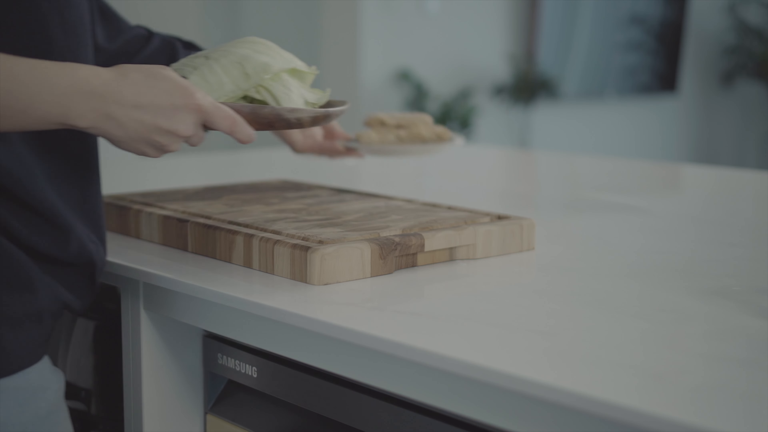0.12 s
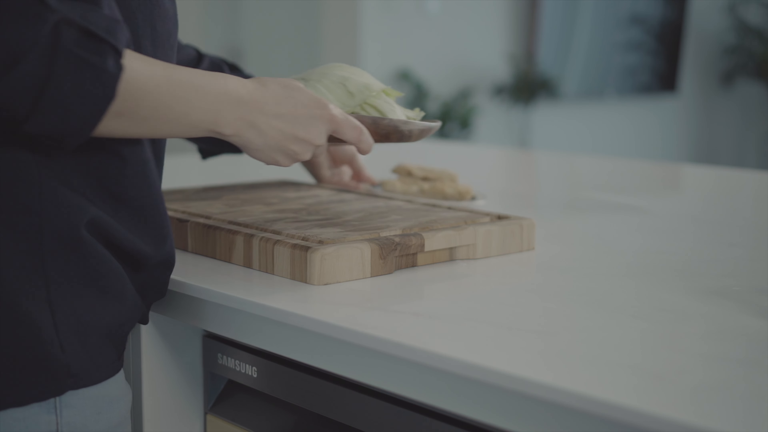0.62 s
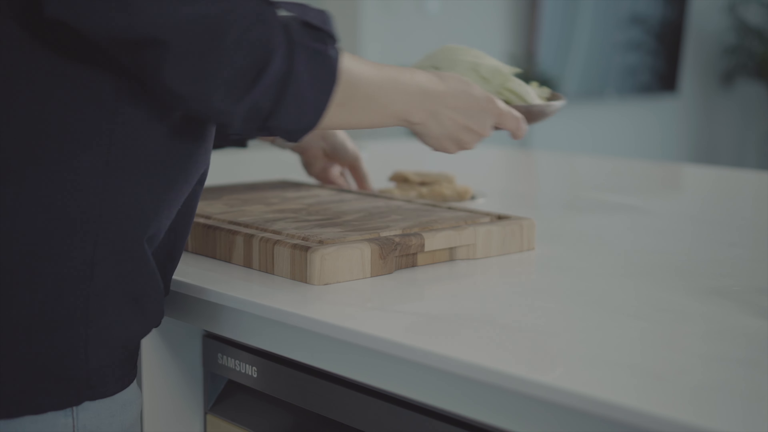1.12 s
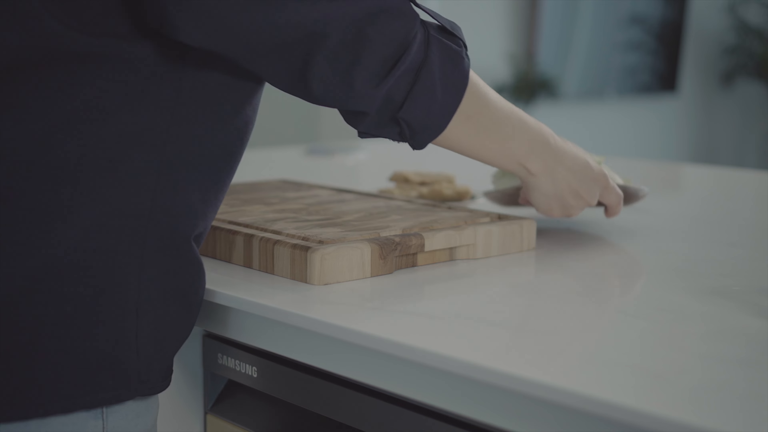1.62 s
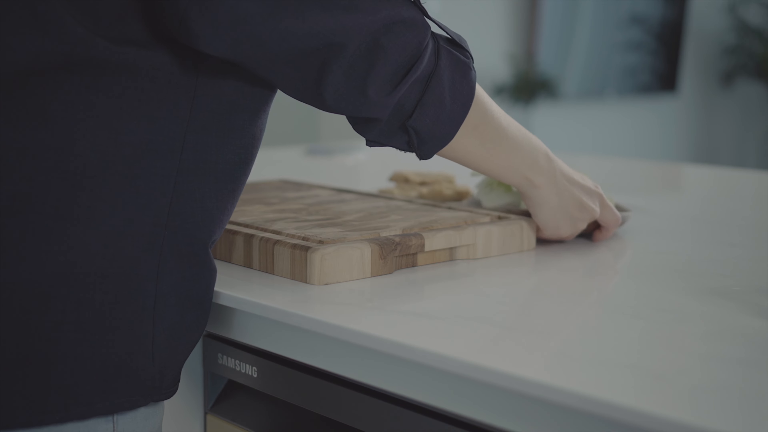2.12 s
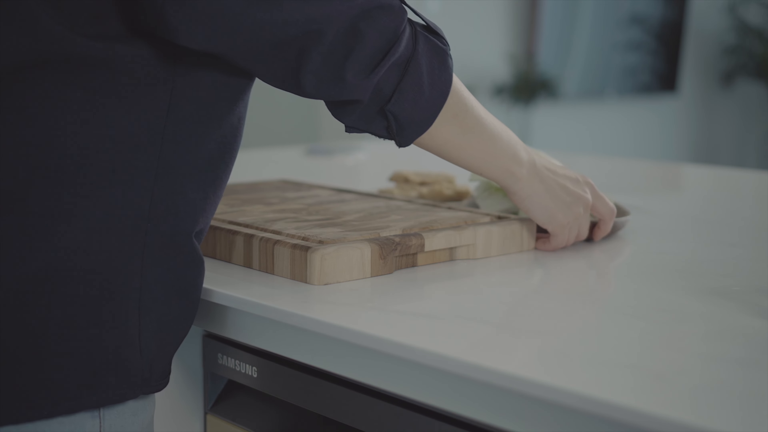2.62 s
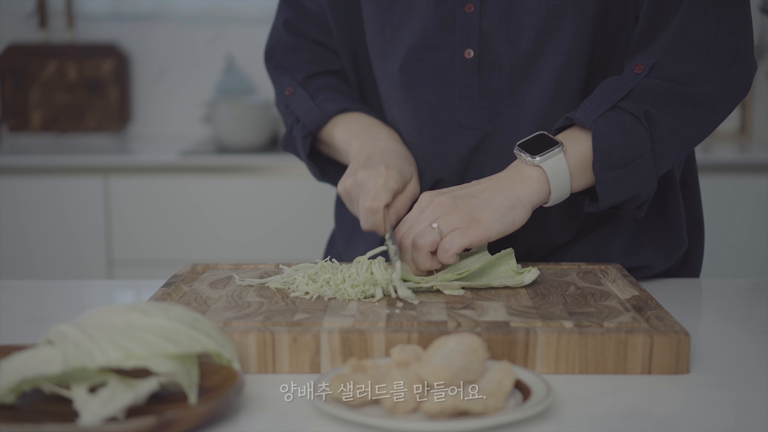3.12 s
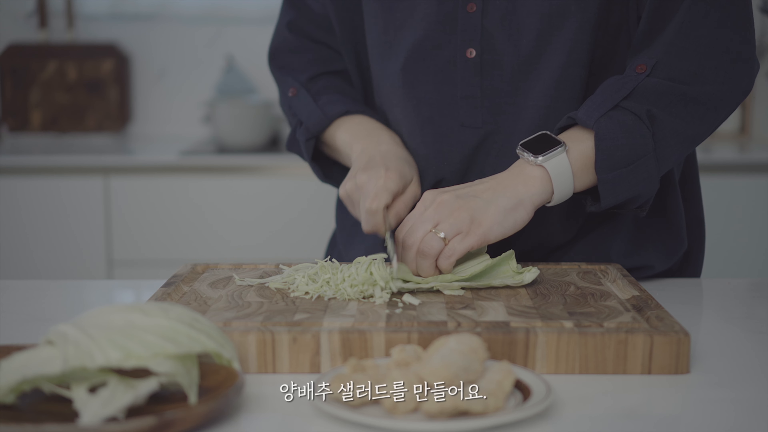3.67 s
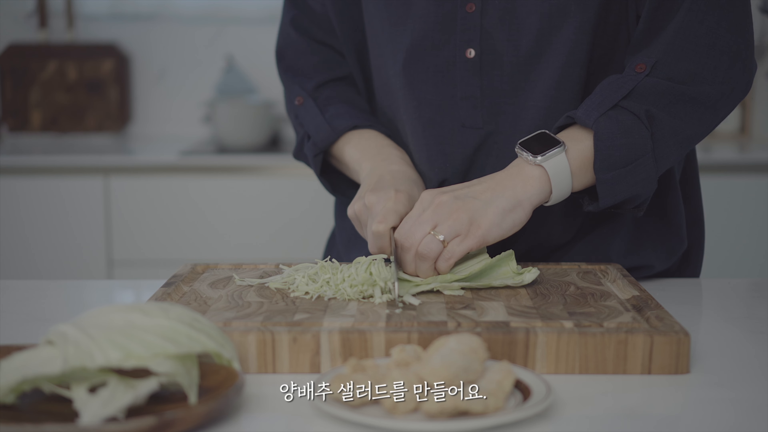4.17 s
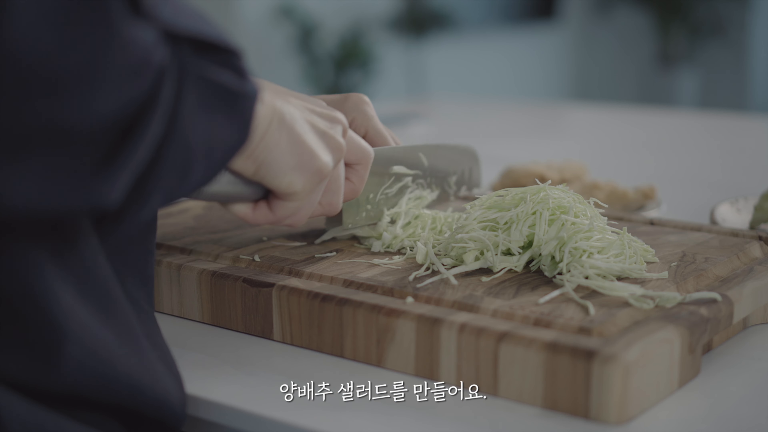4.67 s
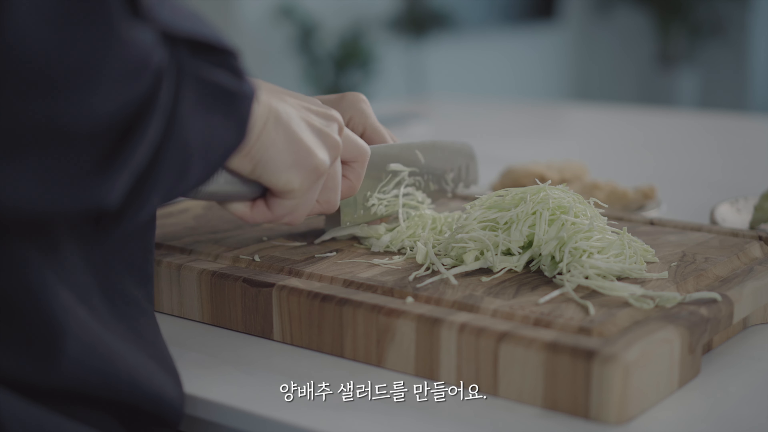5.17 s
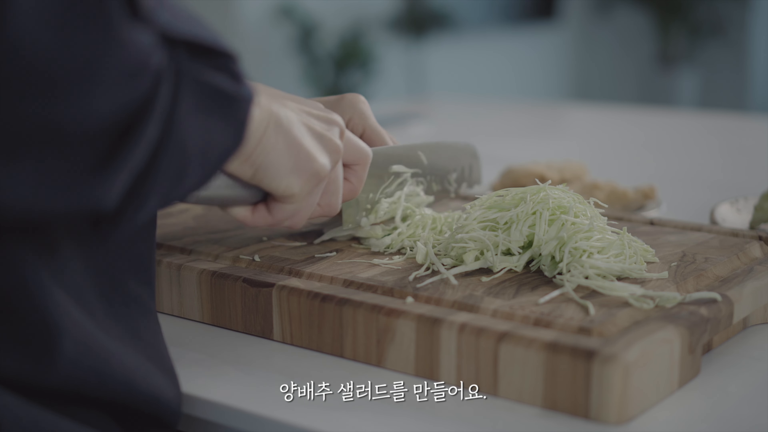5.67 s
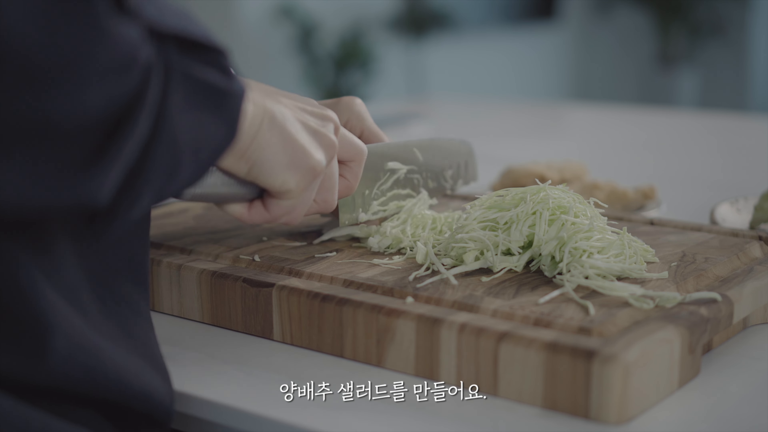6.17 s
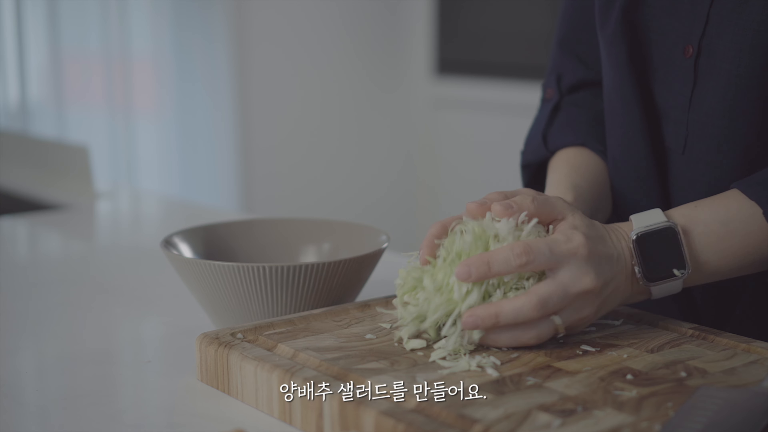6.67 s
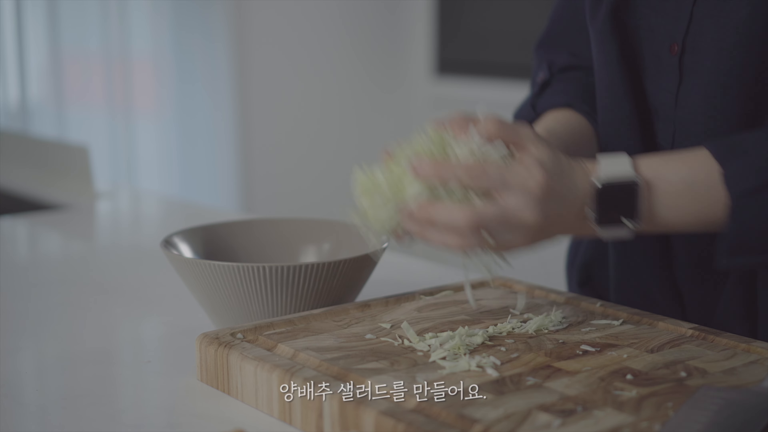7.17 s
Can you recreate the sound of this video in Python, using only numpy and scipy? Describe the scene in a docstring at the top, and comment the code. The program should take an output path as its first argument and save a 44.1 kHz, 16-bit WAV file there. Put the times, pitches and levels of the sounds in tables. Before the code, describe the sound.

In a quiet, hard-walled kitchen, a glazed plate clacks onto a stone counter, then a wooden dish lands much harder. After a pause, a knife tears crisply through cabbage, each main cut ending in a woody knock on a thick board. Tiny blade scrapes and leaf rustles fill the gaps, then only soft handling remains. Close microphone, short bright room echo.

```python
"""A knife shreds cabbage in a hard-walled kitchen: dense clicks shaped by a leaf spectrum make the
tearing, short click bursts make the snaps, and fading sine tones make the knocks on a thick board.
Before the cutting, the end of a clatter is heard, made like the tearing; then a glazed plate and a wooden
dish knock on a stone counter, also as fading sines. Hands move leaves as soft grains; low thuds, rumble,
a quiet hum and filtered-noise hush lie underneath."""
import sys
import numpy as np
from scipy import signal
from scipy.fft import rfft, irfft
from scipy.io import wavfile
from scipy.ndimage import uniform_filter1d

SR = 44100
rng = np.random.default_rng(int(sys.argv[2]) if len(sys.argv) > 2 else 0)


def store_wav(level_fs):
    """Save 16-bit WAV to argv[1]."""
    pcm = np.round(np.clip(np.atleast_2d(level_fs), -1, 1) * 32767)
    wavfile.write(sys.argv[1], SR, pcm.T.astype(np.int16))


def invert_db(level):
    """Linear amplitude ratio for a level in decibels (20 dB per decade), elementwise."""
    return 10 ** (np.asarray(level, dtype=float) / 20)


N = 321684  # samples in the finished scene
LEAD = 4410  # samples of scene before time zero
TIME = np.arange(-LEAD, N) / SR  # s

# room, band by band: f/Hz, time to fall by 60 dB/s, tail level/dB
ROOM_BANDS = [(101.7, 0.94, -6.5), (300, .55, -1), (900, 0.68, -2.5), (2050, 0.65, -4.5),
              (4060, 0.6155, 1.5), (7050, 0.63, -2.5), (15160, 0.17, -8)]
# first echoes off the walls: delay/ms, level/dB
WALL_ECHOES = [(2.3, -13), (3.7, -12), (6.3, -14), (8.9, -14), (13.9, -15), (18.5, -14)]
# colour of the room hush: f/Hz, relative level per Hz/dB
HUSH_SPECTRUM = [(60, -22), (150, 0.5), (500, -4), (1200, -9.5), (4000, -12), (4700, -21.5), (6500, -20),
                 (9000, -26.5), (15800, -32.5)]
# a low hum that sets in once: t/s, f/Hz, level/dB
HUM_SETTING = (6.37, 185, -77)
# soft weight landing on floor or counter: t/s, level before fading and soft start/dB, f/Hz,
# level of the rumble swell before fading and soft start/dB
THUD_EVENTS = [(0.095, -41, 76, -94), (0.627, -40, 64, -68), (1.496, -34.5, 73.4, -70),
               (1.678, -35.5, 68.4, -57), (2.129, -65, 60, -68.5), (2.246, -54, 85.3, -72),
               (2.472, -39.5, 89, -66), (2.989, -33, 103, -44.5), (3.511, -35, 124, -59),
               (4.2, -36, 118, -50), (4.909, -42, 94.2, -54), (5.427, -48, 126, -52.5),
               (5.498, -61, 53.8, -58), (5.922, -42, 120.7, -46.5)]
# ringing tones of the glazed plate: f/Hz, relative level/dB, time to fall by 60 dB/s
PLATE_TONES = [(426, -9.5, 0.056), (672, 0.5, 0.0186), (870, -2, 0.02), (1152, -1, 0.02),
               (1445, 4.5, 0.016), (2020, 14.5, 0.0049), (2220, -8, .015), (2204, -2, 0.012),
               (3000, 6, 0.0032), (3200, -4, 0.025), (3600, -2.5, 0.0032), (4370, -10.5, 0.024),
               (5860, -62, 0.0047), (6840, -22, 0.037), (9000, -26.5, 0.063), (10360, -28, 0.048),
               (12300, -38, 0.059), (14500, -43, .05)]
# ringing tones of the wooden dish: f/Hz, relative level/dB, time to fall by 60 dB/s
DISH_TONES = [(200, -27, 0.071), (316.5, -28.5, 0.008), (631, -13, 0.0084), (1024, -8, 0.029),
              (1350, -13, 0.0034), (1468, 8, 0.0067), (1960, 6.5, 0.0061), (2450, -4, 0.012),
              (3195, -2, 0.01), (3800, -18.5, 0.0076), (4490, -15, 0.0089), (5800, -23.5, 0.005),
              (6780, -18.5, .006), (9350, -27.5, 0.00521), (13000, -6.5, .0015)]
# ringing tones of the chopping board: f/Hz, relative level/dB, time to fall by 60 dB/s
BOARD_TONES = [(119.8, 5, 0.037), (340.8, -4, 0.014), (514, -2.5, 0.00733), (716, 2.5, 0.037),
               (793, 0.5, 0.019), (913.8, 4.5, 0.02), (1139, -7, 0.013), (1700, 18, 0.0029),
               (2224, 4, 0.0055), (2643, 5.5, 0.0072), (3110, -25, 0.006), (3670, -10.5, 0.0086),
               (6200, -15.5, 0.0051), (11000, -25, .002)]
# ringing tones of the knife blade: f/Hz, relative level/dB, time to fall by 60 dB/s
BLADE_TONES = [(9230, 3, 0.0032), (9600, 6, 0.008), (10400, -11, 0.012), (11240, 2.5, .012),
               (13200, 8, 0.011), (15100, 0, .008)]
# blows on the plate: t/s, peak level before the room/dB, contact time/ms,
# f below which the spot barely moves the body/Hz, fading time of the chatter/ms
PLATE_BLOWS = [(0.576, -19, 0.12, 675, 16.6), (1.02, -42.5, 0.33, 350, 34), (1.04, -42, 0.45, 300, 16.5)]
# blows on the dish: t/s, peak level before the room/dB, contact time/ms,
# f below which the spot barely moves the body/Hz, fading time of the chatter/ms
DISH_BLOWS = [(1.78, -7.5, 0.142, 486, 1.4), (2.255, -49.5, 0.84, 300, 22), (2.27, -53, 1.94, 151.5, 22),
              (2.459, -30.5, 0.27, 482, 3.5)]
# knocks on the board: t/s, peak level before the room/dB, contact time/ms,
# f below which the spot barely moves the body/Hz, fading time of the chatter/ms
BOARD_BLOWS = [(2.983, -13.5, 0.3, 260, 0.2), (3.509, -13, 0.21, 1570, 0.35),
               (3.512, -19.5, 0.56, 593, 0.55), (4.197, -16.5, 0.26, 1920, 0.22),
               (4.208, -21, 0.72, 245, 3.4), (4.579, -41, 0.41, 710, 22), (4.876, -31.5, 0.35, 2230, 6.9),
               (4.901, -19, 0.49, 300, 0.56), (5.426, -21.5, 0.62, 300, 0.15),
               (5.884, -34, 0.417, 505, 2.4), (5.907, -27, 0.36, 2200, 1.4),
               (5.922, -23, 0.521, 300, 0.115)]
# colour of moving leaves: f/Hz, relative level per Hz/dB
LEAF_SPECTRUM = [(120, -62), (200, -1), (263, -6.5), (393, -8.5), (732, -3.5), (1830, -5.5), (2830, -6),
                 (3900, -8), (4600, -19.5), (6000, -18), (9820, -22.5), (15800, -35.5)]
# hands moving leaves, one swell a move: start t/s, length/s, level/dB,
# share of the move at which it is loudest, swish f/Hz
LEAF_MOVES = [(3.206, 0.47, -63.5, 0.44, 3000), (3.833, 0.129, -67, 0.18, 3000),
              (4.007, 0.069, -67, 0.98, 3200), (4.674, 0.0702, -59, 0.126, 3800),
              (4.74, .11, -65, 0.95, 3500), (6.253, 0.257, -70, .2, 3600), (6.359, 0.18, -62.5, 0.63, 3020),
              (6.57, 0.064, -63.5, 0.19, 2850), (6.619, .17, -64, 0.9, 2850),
              (6.799, 0.21, -76, 0.22, 3000), (7.12, 0.41, -64.5, 0.58, 3430)]
# blade grazing a fingernail or the board: t/s, peak level before the room/dB, graze length/s
BLADE_GRAZES = [(3.191, -54, 0.042), (4.691, -48, 0.012), (4.762, -53, 0.026), (4.79, -48, .03),
                (5.076, -49, 0.0091), (5.178, -44, 0.013), (5.282, -52.5, .03), (5.679, -51, 0.03),
                (5.788, -43, 0.017), (6.179, -46.5, 0.0093), (6.258, -52, 0.044)]
# colour of tearing cabbage: f/Hz, relative level per Hz/dB
CABBAGE_SPECTRUM = [(88, -68), (150, -6.5), (230, -18), (405, -5), (587, -12), (801, 0), (974, -4.5),
                    (2170, 3.5), (2680, 0.5), (3520, 3), (4810, -10), (6200, -10), (8980, -14),
                    (15800, -30)]
# short snaps of ribs, and a tick on a knock: t/s, peak level before the room/dB, pitch f/Hz,
# brightness/(dB per octave), held between -6 and 8
SHORT_SNAPS = [(0.0844, -46, 3700, -0.5), (2.8747, -44.5, 5650, 3), (2.8846, -43.5, 3282, -1.5),
               (2.9154, -34.5, 3360, 1), (2.9316, -27, 3760, 2), (2.9444, -29.5, 6200, 2.5),
               (2.9538, -30.5, 4000, 1.5), (3.4274, -44.5, 2200, -1), (3.4411, -41, 5930, 0),
               (3.4911, -31, 5900, 7.5), (3.9776, -53, 1900, 8), (4.0806, -47, 3280, 4),
               (4.0964, -51, 2930, 4), (4.1128, -29.5, 5800, 3), (4.139, -26.5, 4000, 2.5),
               (4.1968, -22.5, 6300, 1.5), (4.2074, -27.5, 7500, 6), (4.577, -37.5, 1650, -4),
               (4.8344, -40.5, 8600, 7.5), (4.8469, -36, 3800, -1), (4.9596, -30.5, 2250, -1),
               (4.9714, -40.5, 2270, -3.5), (5.0627, -43, 5500, 5), (5.3168, -41, 4150, 4.5),
               (5.3306, -34.5, 1450, 4.5), (5.345, -43, 4000, 6.5), (5.4054, -31, 3600, 2),
               (5.4584, -40, 9000, 13), (5.4715, -35, 3160, -2), (5.8054, -37.5, 3800, -7.5),
               (5.8144, -37.5, 2670, 8), (5.84, -34, 9000, -2), (5.8566, -27.5, 1803, 5),
               (5.9567, -41, 9600, 8), (6.0924, -59.5, 9000, 2.5), (6.108, -43.5, 3060, 3),
               (6.8937, -61, 3710, -5)]
# knife strokes, after the end of an earlier clatter at the very start: start t/s, length/s,
# level at four fifths of the stroke before bunching/dB, rise to it/dB (negative: starts louder),
# brightness/(dB per octave)
CLATTER_END_AND_STROKES = [(-.05, .058, -53, -4, -1.5), (2.88, .11, -33.5, 31, -0.3),
                           (3.4, 0.059, -49, 28.5, 2), (3.489, .022, -37.5, 17, -2),
                           (3.977, 0.038, -66.5, -6, 0.25), (4.074, .14, -35.5, 32.5, 0.64),
                           (4.839, .065, -40.5, 6, 0.5), (5.335, 0.09, -39.5, 10.5, 0.5),
                           (5.753, 0.065, -49.5, 15.5, 0.5), (5.853, 0.069, -40.5, 11.5, 1)]


def read(points, hz):
    """Reads a spectrum table at any frequency, on a logarithmic frequency axis."""
    f, value = np.transpose(points)
    return np.interp(np.log(hz + 1), np.log(f + 1), value)


def add(mix, s, sound):
    """Mixes a sound in at time s, in seconds."""
    part = mix[round(s * SR) + LEAD:][:len(sound)]
    part += sound[:len(part)]


def colour(points, tilt_db=0., peak=(1000, 0, 1)):
    """A short filter of energy 1: a spectrum, a tilt per octave and one peak (Hz, dB, octaves)."""
    hz = abs(np.fft.fftfreq(2048, 1 / SR))
    peak_hz, peak_db, octaves = peak
    level_db = read(points, hz) + tilt_db * np.log2((hz + 100) / 3000)
    level_db += peak_db * np.exp(-.5 * (np.log2((hz + 1) / peak_hz) / octaves) ** 2)
    log_gain = np.log(invert_db(level_db))
    # the Hilbert transform gives the phase that makes the filter respond at once
    taps = np.fft.ifft(np.exp(np.conj(signal.hilbert(log_gain)))).real[:1024]
    return taps / np.linalg.norm(taps)


def steady(points):
    """Steady noise of rms 1 with this spectrum."""
    hz = np.fft.rfftfreq(len(TIME), 1 / SR)
    spectrum = rfft(rng.standard_normal(len(TIME))) * invert_db(read(points, hz))
    noise = irfft(spectrum, len(TIME))
    return noise / np.std(noise)


def crackle(count, per_s, spread_db):
    """Random clicks of uneven size and random sign, scaled to rms 1."""
    chance = rng.random(count)
    size = rng.exponential(1, count)
    sign = rng.choice([-1., 1.], count)
    clicks = (chance < per_s / SR) * sign * invert_db(spread_db * np.minimum(size, 3))
    return clicks / (np.std(clicks) + 1e-12)


def kitchen(near):
    """Hard walls give first echoes, then a dense tail in which each band dies at its own speed."""
    taps = np.zeros(SR)
    at = np.arange(300, SR - 12, 12)
    taps[at + rng.integers(0, 12, len(at))] = rng.choice([-1., 1.], len(at))
    hz, t, bands = signal.stft(taps, SR, nperseg=256)
    table = np.array(ROOM_BANDS)
    t60 = read(table[:, [0, 1]], hz)[:, None]
    tail_db = read(table[:, [0, 2]], hz)[:, None]
    bands *= invert_db(tail_db - 60 * t / t60)
    bands /= np.sqrt(t60 * len(at) / np.log(1e6))  # evens out the energy of long and short tails
    response = signal.istft(bands, SR, nperseg=256)[1][:SR]
    response *= 1 - np.exp(-np.arange(SR) / SR / 0.005)  # the tail takes a moment to build
    response[0] = 1  # direct sound
    for ms, db in WALL_ECHOES:
        response[round(ms * SR / 1000)] += invert_db(db)
    return signal.fftconvolve(near, response)[:len(near)]


def hush():
    """The faint hush of the room is steady noise, strongest in the lows and weak in the treble."""
    return invert_db(-72.5) * steady(HUSH_SPECTRUM)


def rumble():
    """Very low noise that each thud swells for a while."""
    rise_s, t60_s = 0.037, 0.9
    t = np.arange(SR) / SR
    level = np.full(len(TIME), invert_db(-65))  # at rest
    for s, _, _, shudder_db in THUD_EVENTS:
        add(level, s - rise_s, invert_db(shudder_db - 60 * t / t60_s) * (1 - np.exp(-t / rise_s)))
    return steady([(15, 0.5), (30, 1.5), (70, -6.5), (130, -13.0), (250, -59)]) * level


def hum():
    """A narrow band of noise makes a slightly fuzzy low hum."""
    s, hz, db = HUM_SETTING
    band = [(hz - 30, -50), (hz - 4, -6), (hz, 0), (hz + 4, -6), (hz + 30, -50)]
    return invert_db(db) * steady(band) * (TIME > s)


def thuds(mix):
    """A soft landing is a low tone that swells gently and dies."""
    t60_s, rise_s = 0.12, 0.027
    t = np.arange(SR // 2) / SR
    for s, level_db, hz, _ in THUD_EVENTS:
        fade = invert_db(level_db - 60 * t / t60_s) * (1 - np.exp(-t / rise_s))
        add(mix, s, fade * np.sin(2 * np.pi * hz * t))


def blows(mix, tones, table):
    """A blow rings a body's tones from its own spot; a long contact cannot drive the high ones."""
    hz, db, t60 = np.transpose(tones)[:, :, None]
    sign = (-1.) ** np.arange(len(tones))[:, None]  # neighbouring tones push the air in opposite senses
    t = np.arange(SR // 5) / SR
    for s, peak_db, contact_ms, low_hz, chatter_ms in table:
        spot_db = 1.5 * rng.standard_normal(hz.shape)
        drive = sign * invert_db(db + spot_db)
        drive = drive / (1 + (hz * contact_ms / 1000) ** 3) / (1 + (low_hz / hz) ** 3)
        sound = (drive * invert_db(-60 * t / t60) * np.sin(2 * np.pi * hz * t)).sum(0)
        sound *= 1 - np.exp(-t / (contact_ms / 1000))  # the force builds up over the contact
        # small rebounds follow the first blow
        chatter = 0.18 * crackle(len(t), 1500, 2.1) * np.exp(-t * 1000 / chatter_ms)
        chatter[0] = 1
        sound = signal.fftconvolve(sound, chatter)[:len(t)]
        add(mix, s, invert_db(peak_db) * sound / abs(sound).max())


def rustle(mix, start, length, db, top, swish_hz):
    """Damp leaves sliding make soft, dense grains that swell once in each move."""
    t = np.arange(0, length, 1 / SR)
    swell_db = np.interp(t / length, [0, top, 1], [-6, 0, -6])
    grains = invert_db(db + swell_db) * crackle(len(t), 12000, 2.2)
    grains *= signal.windows.tukey(len(t), .1)  # soft ends
    add(mix, start, np.convolve(grains, colour(LEAF_SPECTRUM, peak=(swish_hz, 1, 0.091))))


def grazes(mix):
    """Tiny slips scratch and set the high tones of the blade singing for a moment."""
    hz, db, t60 = np.transpose(BLADE_TONES)[:, :, None]
    t = np.arange(SR // 10) / SR
    for s, peak_db, length in BLADE_GRAZES:
        spot_db = 3 * rng.standard_normal(hz.shape)
        ring = (invert_db(db + spot_db - 60 * t / t60) * np.sin(2 * np.pi * hz * t)).sum(0)
        ring /= np.linalg.norm(ring)
        ring[:1024] += invert_db(10.0) * colour(CABBAGE_SPECTRUM, 1.6)  # the scratch itself
        slips = crackle(len(t), 4200, 5.9) * (t < length) * np.exp(-t / 0.0455)
        sound = signal.fftconvolve(ring, slips)
        add(mix, s, invert_db(peak_db) * sound / abs(sound).max())


def snaps(mix):
    """A rib snap, or the tick on a knock, is a burst of clicks dying within milliseconds around one pitch."""
    dying = np.exp(-np.arange(256) / SR / .0014)
    for s, peak_db, hz, bright_db in SHORT_SNAPS:
        pitch = colour(CABBAGE_SPECTRUM, np.clip(bright_db, -6, 8), peak=(hz, 10.5, 0.1))
        sound = np.convolve(crackle(len(dying), 16000, 1.3) * dying, pitch)
        add(mix, s, invert_db(peak_db) * sound / abs(sound).max())


def stroke(mix, start, length, turn_db, rise_db, tilt):
    """Dark and bright layers burst in bunches as the edge tears leaves; a clatter's end is made alike."""
    turn_at, rise_bend, sag_db = 0.81, 1.54, 6  # share of the stroke, curve, fall after the turn in dB
    brighten_db = 0.5  # dB per octave gained from start to end as the edge speeds up
    bunch_db, bunch_samples = 4.5, 150  # unevenness of the bursts, smoothing length
    t = np.arange(0, length, 1 / SR)
    done = t / length
    before = np.maximum(1 - done / turn_at, 0)
    after = np.maximum(done - turn_at, 0) / (1 - turn_at)
    level_db = turn_db - rise_db * before ** rise_bend - sag_db * after
    level_db -= 20 * np.exp(-t / 0.00107)  # the edge bites gradually
    bright_share = np.clip(.5 + (tilt + brighten_db * (done - .5)) / 8, 0, 1)
    for tilt_db in (-4, 4) * 3:  # three dark and three bright layers, dB per octave
        wander = uniform_filter1d(rng.standard_normal(len(t)), size=bunch_samples)
        bunches = invert_db(bunch_db * np.sqrt(bunch_samples) * wander)
        bursts = invert_db(level_db) * bunches * crackle(len(t), 2500, 2.3) / np.sqrt(3)
        weight = bright_share if tilt_db > 0 else 1 - bright_share
        add(mix, start, np.convolve(bursts * weight, colour(CABBAGE_SPECTRUM, tilt_db)))


def scene():
    """The near sources sound in the kitchen, over thuds and background that skip the room echo."""
    near, low = np.zeros((2, len(TIME)))
    thuds(low)
    blows(near, PLATE_TONES, PLATE_BLOWS)
    blows(near, DISH_TONES, DISH_BLOWS)
    blows(near, BOARD_TONES, BOARD_BLOWS)
    for move in LEAF_MOVES:
        rustle(near, *move)
    grazes(near)
    snaps(near)
    for row in CLATTER_END_AND_STROKES:
        stroke(near, *row)
    mix = kitchen(near) + low + hush() + rumble() + hum()
    return mix[None, LEAD:]


def top_cut(x):
    """Nothing passes above the cut-off."""
    return signal.sosfilt(signal.butter(12, 16520, fs=SR, output="sos"), x)


def record(dry):
    """The microphone gently rolls off the deepest bass, below 30 Hz."""
    b, a = signal.butter(N=1, Wn=30 / (SR / 2), btype="high")
    finished = signal.lfilter(b, a, dry)
    return top_cut(finished)


dry = scene()
out = record(dry)
store_wav(out)
```